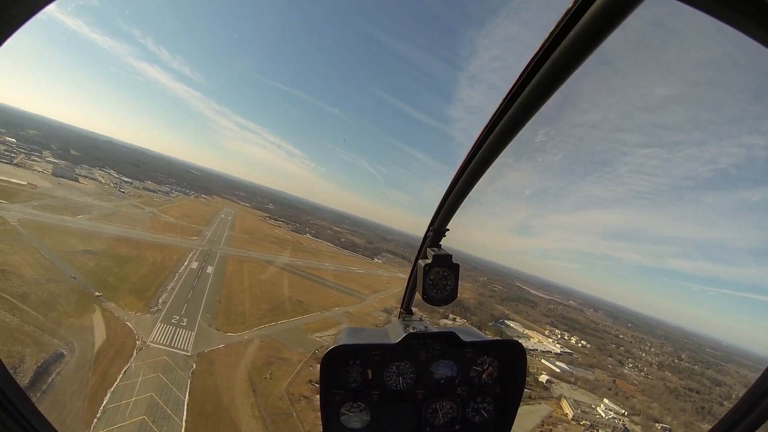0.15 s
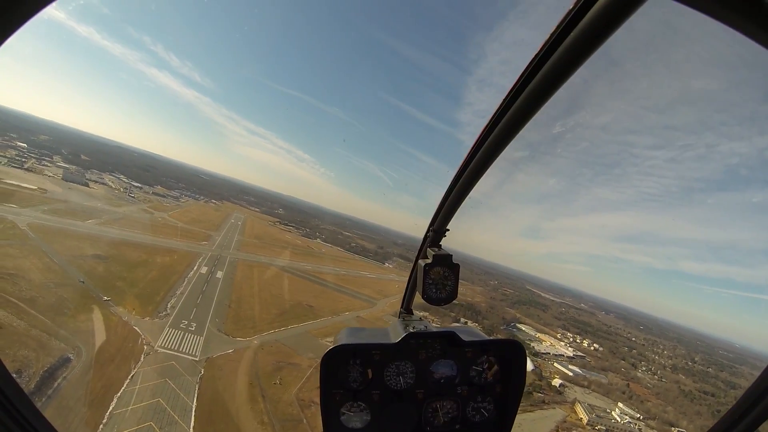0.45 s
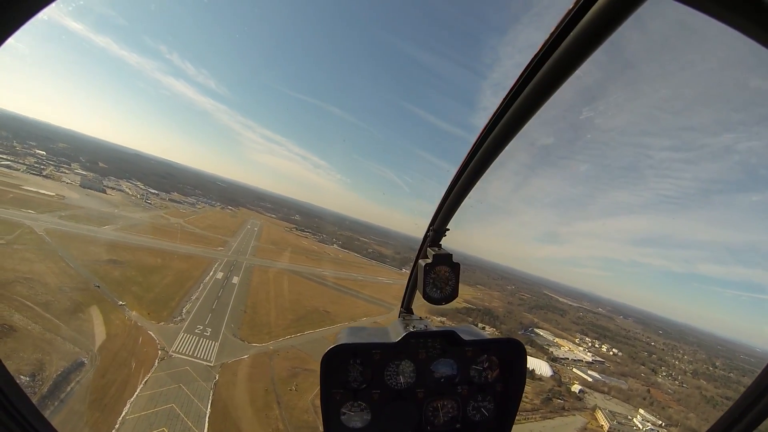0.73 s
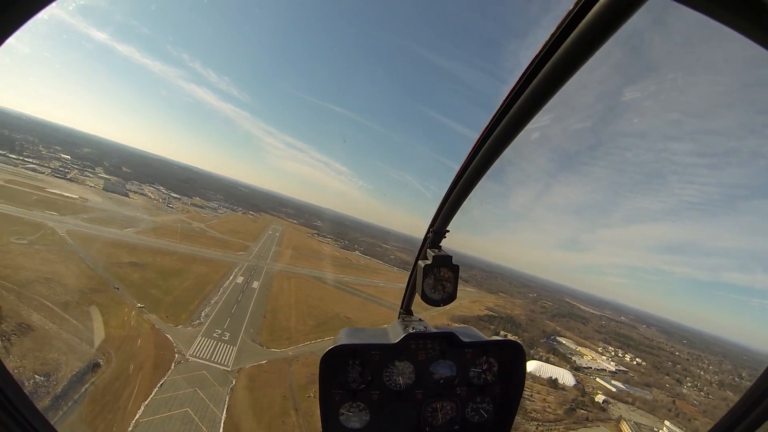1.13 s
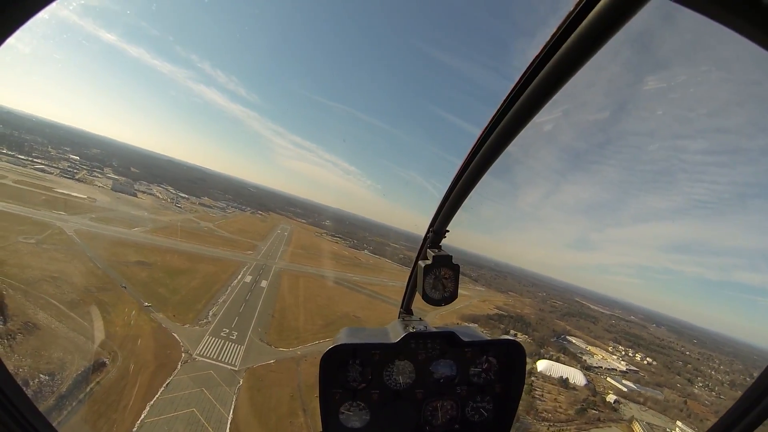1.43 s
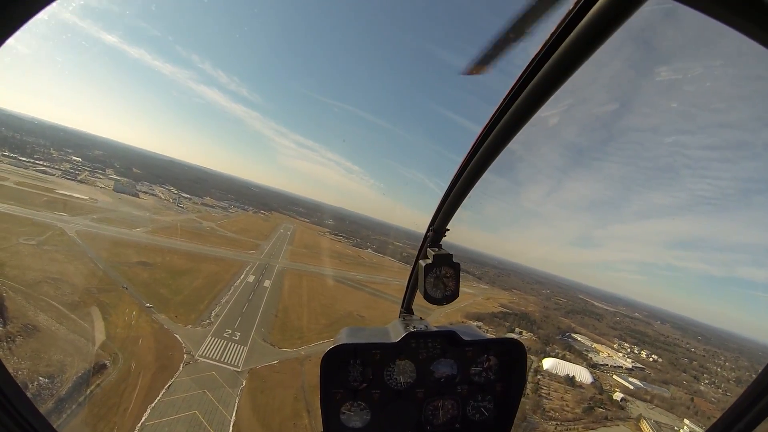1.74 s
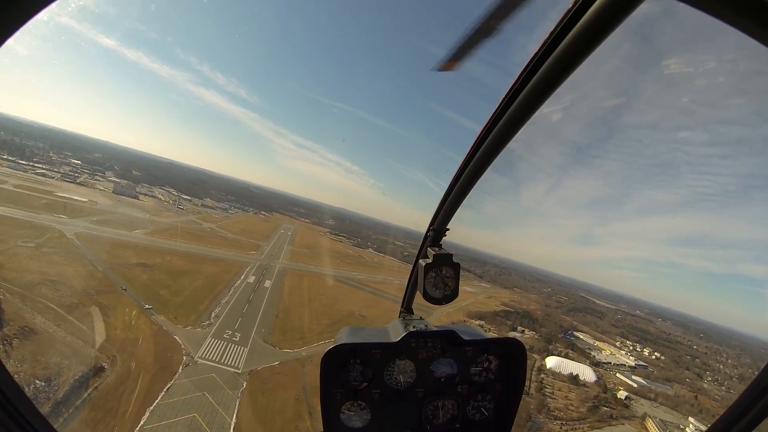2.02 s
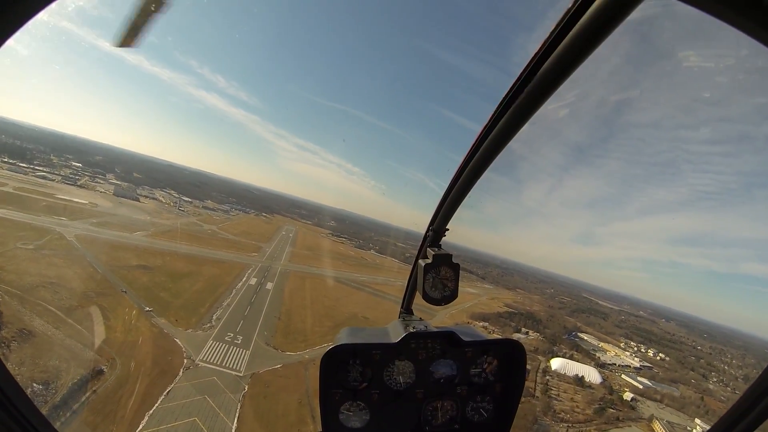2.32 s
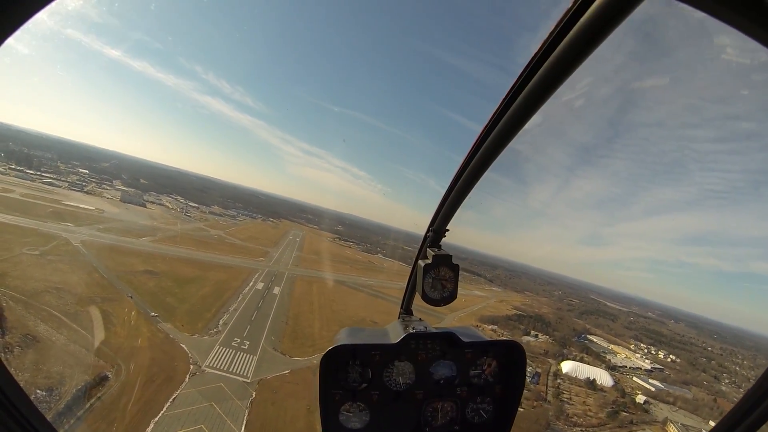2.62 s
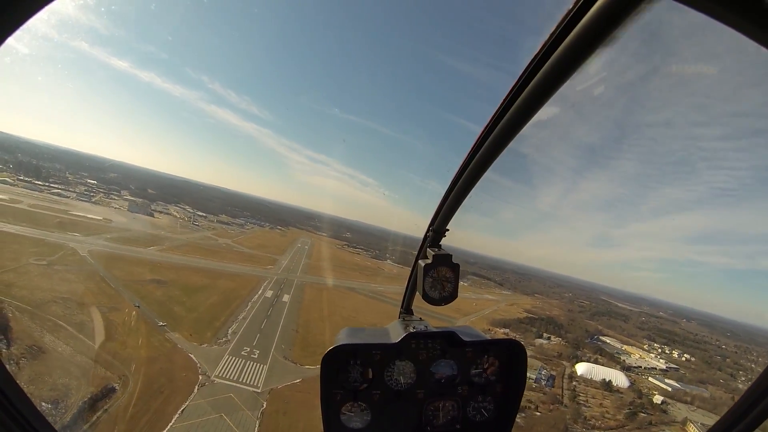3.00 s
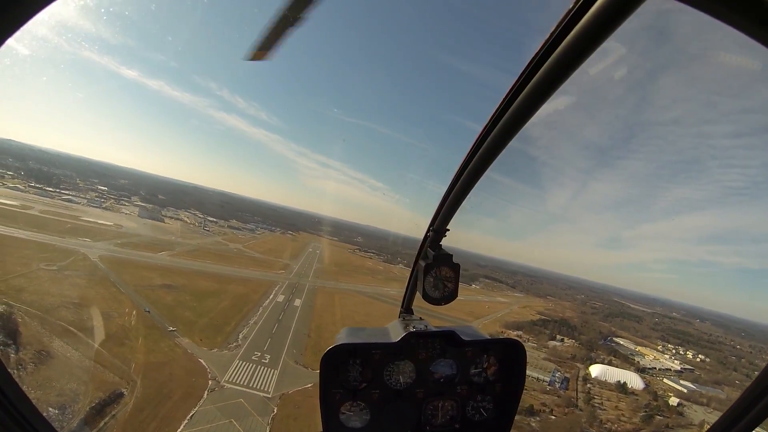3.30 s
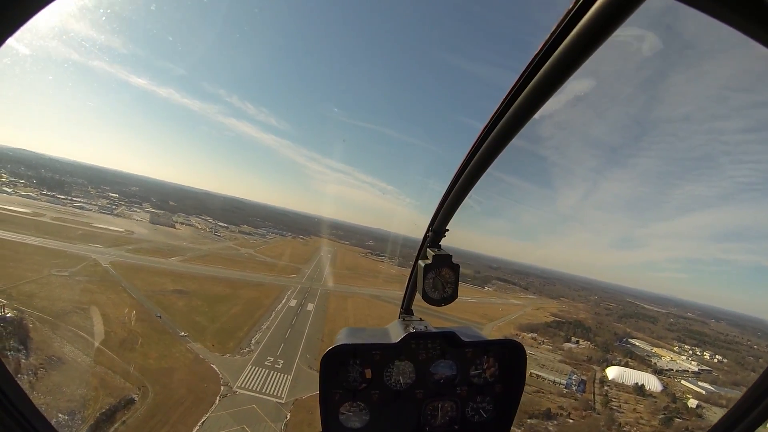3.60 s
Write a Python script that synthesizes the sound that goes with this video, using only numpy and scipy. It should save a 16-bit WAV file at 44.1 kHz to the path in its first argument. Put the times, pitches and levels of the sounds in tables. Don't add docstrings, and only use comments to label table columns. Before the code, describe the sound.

A light helicopter in steady flight heard from its cabin, with throbbing blades, gear whine and air noise.

```python
import sys
import numpy as np
from scipy import signal
from scipy.fft import rfft, irfft, next_fast_len
from scipy.io import wavfile
from scipy.ndimage import uniform_filter1d, map_coordinates

SR = 44100
rng = np.random.default_rng(int(sys.argv[2]) if len(sys.argv) > 2 else 0)


def to_linear_factor(level_db):
    exponent = np.asarray(level_db, float) / 20
    return 10 ** exponent


def wav_record(signal):
    frames = np.transpose(np.atleast_2d(signal))
    bounded = np.clip(frames, -1, 1)
    quanta = np.round(bounded * 32767).astype(np.int16)
    wavfile.write(sys.argv[1], SR, quanta)


N = 165375

BLADE_HZ, FIRST_BLADE_S = 14.1417, .034
# time in seconds,
# push from -1 to 1, ducking of the recorder in dB.
THUDS = [(0, -0.29, 2), (0.111, -0.45, 1.5), (0.282, 0.69, 2.5), (0.319, -0.56, 3), (0.53, -0.15, 3),
         (0.688, -0.25, 3.5), (0.803, -0.45, 1), (0.945, -0.32, 2), (1.085, -0.23, 3.5),
         (1.227, -0.29, 2.5), (1.371, -0.37, 3.5), (1.514, -0.33, 2.5), (1.583, -0.27, 2),
         (1.722, -0.32, 3), (1.867, -0.22, 3), (1.936, -0.23, 2.5), (2.065, 0.42, 1), (2.075, -0.24, 3.5),
         (2.292, -0.32, 3.5), (2.387, 0.38, 3.5), (2.549, 0.12, 1), (2.640, -0.4, 5.5), (2.740, 0.32, 2.5),
         (2.852, 0.32, -0.5), (2.928, -0.049, 4), (2.998, -0.41, 2.5), (3.141, -0.12, 2), (3.233, 0.25, 2),
         (3.425, -0.15, 1.5), (3.495, -0.21, 2.5), (3.589, 0.49, 3), (.135, 0.17, 1), (.391, -.3, -0.5),
         (.625, 0.3, 1), (.641, 0.26, 0.5), (2.782, -0.32, 1), (3.348, -.25, 1), (3.56, -0.2, 0),
         (3.632, -0.28, 1.5), (3.701, -0.31, 2)]


def unit(x):
    return x / np.sqrt(np.mean(x ** 2) + 1e-20)


def wobble(rate):
    knots = rng.standard_normal(int(N * rate / SR) + 4)
    return map_coordinates(knots, [np.arange(N) * rate / SR])


def shaft_time():
    # time in seconds, whine in Hz.
    whine = [(0, 1136), (.23, 1140), (.46, 1144.2), (.7, 1146.5), (.93, 1146.3), (1.16, 1143.1),
             (1.39, 1140.1), (1.86, 1137), (2.2, 1134.8), (2.55, 1134.4), (2.95, 1132.5), (3.4, 1135.2),
             (3.75, 1136.3)]
    nominal_hz = 1136
    seconds, whine_hz = np.transpose(whine)
    return np.cumsum(np.interp(np.arange(N) / SR, seconds, whine_hz)) / nominal_hz / SR


def orders(turns, which, levels_db, sway_db, wander, sway_hz, spread=1):
    total = 0
    for order, order_db in zip(which, levels_db):
        gain = np.sqrt(2) * to_linear_factor(order_db + sway_db * wobble(sway_hz))
        cycles = order * turns + spread * rng.random() + wander * wobble(sway_hz)
        total = total + gain * np.cos(2 * np.pi * cycles)
    return total


def noise(spectrum, patchy_db):
    z = signal.stft(rng.standard_normal(N + 1024), nperseg=512)[2]
    patches = uniform_filter1d(rng.standard_normal(z.shape), size=6, axis=0)
    patches = uniform_filter1d(patches, size=10, axis=1)
    x = unit(signal.istft(z * to_linear_factor(patchy_db * unit(patches)), nperseg=512)[1][:N])
    m = next_fast_len(N + 8192)
    f, db = np.transpose(spectrum)
    log_hz = np.log(np.fft.rfftfreq(m, 1 / SR) + 1)
    colour_db = np.interp(log_hz, np.log(f + 1), db, left=-120, right=-120)
    return irfft(rfft(x, m) * to_linear_factor(colour_db), m)[:N] * np.sqrt(SR / 2)


def vent():
    # time in seconds, pitch in Hz, level in dB.
    vent_path = [(0, 13550, -97), (.3, 13850, -91), (.55, 13840, -87), (.68, 14000, -85), (.8, 14400, -96),
                 (0.998, 14900, -91), (1.2, 14930, -100), (2.6, 14400, -100), (2.85, 14300, -89),
                 (3.1, 13950, -89), (3.3, 13700, -87), (3.45, 13500, -89), (3.6, 13050, -84),
                 (3.75, 13000, -88)]
    width_hz = 550
    t = np.arange(N) / SR
    seconds, pitch_hz, level_db = np.transpose(vent_path)
    phase = 2 * np.pi * np.cumsum(np.interp(t, seconds, pitch_hz) + 120 * wobble(8)) / SR
    whistle = wobble(width_hz) * np.cos(phase) + wobble(width_hz) * np.sin(phase)
    return to_linear_factor(np.interp(t, seconds, level_db) + 3.5 * wobble(14)) * unit(whistle)


def air(t):
    # frequency in Hz, density in dB per Hz.
    rumble_colour = [(14, -16), (24, -6), (38, 5.5), (74, -9), (125, -3.5), (240, -4.5), (300, -13.5),
                     (900, -27.5)]
    rush_colour = [(120, -28.5), (300, -10.5), (500, -15.5), (1000, -21.5), (1300, -33), (1500, -34),
                   (2050, -35), (2200, -53.5)]
    hiss_colour = [(1400, -58), (2100, -41), (2500, -40), (2900, -37.5), (4200, -48.5), (4700, -54),
                   (6200, -59.5), (7200, -76)]
    fizz_colour = [(4000, -70.5), (6000, -61.5), (7200, -66), (10300, -68), (11000, -70.5), (14000, -73.5),
                   (15700, -79.5), (17000, -83.5)]
    # time in seconds, level in dB.
    airflow = [(0, 0), (.15, 0), (.3, 0.5), (.42, 2.5), (.52, 3.5), (.63, 2), (.72, 0.5), (1.1, 1.5),
               (1.4, 0.5), (1.7, 0.5), (2.1, 1.5), (2.5, 1.5), (2.9, 1.5), (3.3, 1), (3.75, 1)]
    # time in seconds, rise of the hiss in dB.
    slaps = [(.525, -1), (.756, 1), (.8, 4.5), (1.084, 5.5), (1.221, 4), (1.51, 3.5), (1.72, 4.5),
             (1.862, 4.5), (2.452, -2), (2.53, 3), (2.6, 3.5), (2.635, 4.5), (2.92, 3.5)]
    air_db, chop_db, slap_s = -42, 0.5, .007
    seconds = np.arange(N) / SR
    flow_db = np.interp(seconds, *np.transpose(airflow))
    blade_db = chop_db * np.cos(2 * np.pi * BLADE_HZ * (t - FIRST_BLADE_S))
    swing_db = flow_db + blade_db + 0.27 * wobble(25)
    slap_db = sum(rise * np.exp(-((seconds - start) / slap_s) ** 2) for start, rise in slaps)
    rumble = noise(rumble_colour, patchy_db=0.76)
    rush = to_linear_factor(slap_db / 2) * noise(rush_colour, patchy_db=1.08)
    hiss = to_linear_factor(slap_db) * noise(hiss_colour, patchy_db=-0.65)
    fizz = noise(fizz_colour, patchy_db=0.5)
    return to_linear_factor(air_db) * (rumble + to_linear_factor(swing_db) * (rush + hiss + fizz))


def ping():
    start_s, ring_hz, peak_db, t60_s = 1.221, 2250, -34, .06
    since = np.clip(np.arange(N) / SR - start_s, 0, None)
    onset = 1 - np.exp(-since / .002)
    return to_linear_factor(peak_db - 60 * since / t60_s) * np.sin(2 * np.pi * ring_hz * since) * onset


def tail_rotor(t):
    tail_orders = [2, 4, 6, 9, 11, 12, 13, 22]
    tail_db = [-27.5, -36, -26, -28.5, -38.5, -34.5, -49.5, -41.5]
    return orders(17.02 * t, tail_orders, tail_db, sway_db=1.3, wander=0.055, sway_hz=4)


def engine(t):
    engine_orders = [1, 3, 4, 5, 6]
    engine_db = [-29.5, -28, -37.5, -39.5, -51]
    return orders(84.15 * t, engine_orders, engine_db, sway_db=1.2, wander=.03, sway_hz=3)


def gearbox(t):
    gear_orders = [9, 11, 13, 31, 33, 35, 42, 44, 56, 78]
    gear_db = [-34.5, -34.5, -38.5, -44, -44.5, -62.5, -63, -64.5, -70.5, -64.5]
    load_share = [0.45, 1.3, 0.25, 0.58, 1.1, 1.2, 1, 1, 1, 0.9]
    # time in seconds, change of the mesh in dB.
    load = [
        (0, 0.5),
        (.3, -1.5),
        (.8, -4),
        (1.2, -4.5),
        (1.7, -2),
        (2.1, 0),
        (2.4, 2.5),
        (2.9, 2),
        (3.3, 1.5),
        (3.75, 1.5),
    ]
    belt_hz, belt_slip_s = 4.1, 9e-5
    meshed = 36.643 * (t + belt_slip_s * np.sin(2 * np.pi * belt_hz * t))
    load_db = np.interp(t, *np.transpose(load))
    levels_db = [order_db + share * load_db for order_db, share in zip(gear_db, load_share)]
    gears = orders(meshed, gear_orders, levels_db, sway_db=.9, wander=.03, sway_hz=6, spread=.15)
    rattle = orders(meshed, [22.1], [-44], sway_db=4.5, wander=.2, sway_hz=16)
    return gears + rattle


def thuds():
    half_width_s = 0.0019
    t = np.arange(N) / SR
    total = np.zeros(N)
    for start, push, _ in THUDS:
        u = (t - start) / half_width_s
        total += push * (1 - 0.49 * u ** 2) * np.exp(-u ** 2 / 2)
    return total


def main_rotor(t):
    blade_orders = [1, 2, 3, 4]
    blade_db = [-28.5, -31, -38, -21.5]
    # time in seconds, change of the highest blade order in dB.
    effort = [
        (0, -4),
        (.4, -4),
        (.65, 2.5),
        (1, -4),
        (1.4, 0),
        (1.9, 0),
        (2.1, 2),
        (2.6, 2),
        (3.3, 1.5),
        (3.75, -0.5),
    ]
    turns = BLADE_HZ * (t - FIRST_BLADE_S)
    effort_db = np.interp(t, *np.transpose(effort))
    total = 0
    for order, order_db in zip(blade_orders, blade_db):
        swayed_db = order_db + effort_db * order / max(blade_orders) + 0.8 * wobble(3.4)
        total = total + np.sqrt(2) * to_linear_factor(swayed_db) * np.cos(2 * np.pi * order * turns)
    return -total


def scene():
    t = shaft_time()
    drivetrain = tail_rotor(t) + engine(t) + gearbox(t)
    return (vent() + air(t) + ping() + drivetrain + thuds() + main_rotor(t))[None]


def clock_leak(t):
    # frequency in Hz, rms level in dB.
    leaks = [(12000, -94), (13000, -95), (15000, -98)]
    return sum(np.sqrt(2) * to_linear_factor(tone_db) * np.sin(2 * np.pi * tone_hz * t) for tone_hz, tone_db in leaks)


def chatter(t):
    # time in seconds, peak level in dB.
    bursts = [(0.05, -56), (0.1087, -54), (0.1331, -52.5), (0.1765, -54.5), (0.2645, -52), (0.2787, -49),
              (0.3167, -47), (0.3894, -57), (0.5058, -54), (0.5292, -52), (0.6235, -49.5), (0.6394, -53),
              (0.6683, -53), (0.6908, -53), (0.756, -50), (0.9413, -52), (1.0144, -52), (1.0855, -51),
              (1.1124, -53), (1.1628, -53.5), (1.1807, -56), (1.2256, -53), (1.3678, -51), (1.4384, -52.5),
              (1.5125, -52), (1.5324, -51), (1.5808, -51), (1.6287, -57.5), (1.6723, -51), (1.721, -52),
              (1.7994, -53.5), (1.8647, -49), (1.888, -56), (1.9325, -48), (1.954, -56), (2.0732, -51),
              (2.2627, -51), (2.2875, -50.5), (2.378, -49), (2.3846, -53), (2.4259, -54), (2.5406, -52.5),
              (2.5932, -52), (2.6384, -48.5), (2.7367, -49), (2.7806, -54), (2.8529, -54), (2.8724, -51.5),
              (2.924, -52), (2.9953, -48.5), (3.0375, -52.5), (3.1378, -52), (3.2296, -49.5), (3.3468, -50),
              (3.4227, -51), (3.492, -48.5), (3.5822, -50), (3.6301, -53), (3.7, -52)]
    # frequency in Hz, density in dB per Hz.
    burst_colour = [(1500, -30), (3000, 0), (4500, 2), (7000, 0), (10500, -6), (13000, -12), (16000, -24)]
    lag_s, rise_s, fall_s = .002, 0.0016, .0007
    shape = np.zeros(N)
    for start, peak_db in bursts:
        since = t - start - lag_s
        shape += to_linear_factor(peak_db) * np.exp(-(since / np.where(t < start + lag_s, rise_s, fall_s)) ** 2)
    return to_linear_factor(-4) * shape * unit(noise(burst_colour, patchy_db=3))


def gain_control(dry, t):
    duck_s, recover_s, rest_db = .002, 0.12, 1.5
    tick_s, tick_scatter = .0004, .7
    stepped = .42
    hunt_db, near = .045, .42
    count = int(N / SR / tick_s) + 2
    ticks = (np.arange(count) - 1 + tick_scatter * rng.random(count)) * tick_s
    wanted_db = np.full(count, rest_db)
    for start, _, duck_db in THUDS:
        since = ticks - start + duck_s / 2
        wanted_db -= duck_db * np.clip(since / duck_s, 0, 1) * np.exp(-np.clip(since, 0, None) / recover_s)
    smooth_db = np.interp(t, ticks, wanted_db)
    tall = np.interp(ticks, t, np.abs(dry[0]) * to_linear_factor(smooth_db)) / near
    hunting_db = hunt_db * np.tanh(tall ** 3) * rng.standard_normal(count)
    last = np.searchsorted(ticks, t) - 1
    gain_db = smooth_db + stepped * (wanted_db[last] - smooth_db) + hunting_db[last]
    return smooth_db, uniform_filter1d(gain_db, size=3)


def soft_overload(dry, smooth_db):
    headroom, knee = .85, 4
    return dry / (1 + np.abs(dry * to_linear_factor(smooth_db) / headroom) ** knee) ** (1 / knee)


def roll_off(x):
    return signal.sosfilt(signal.butter(12, 15720, fs=SR, output="sos"), x)


def record(dry):
    t = np.arange(N) / SR
    smooth_db, gain_db = gain_control(dry, t)
    rounded = soft_overload(dry, smooth_db)
    return roll_off(rounded * to_linear_factor(gain_db) + clock_leak(t) + chatter(t))


dry = scene()
out = record(dry)
wav_record(out)
```